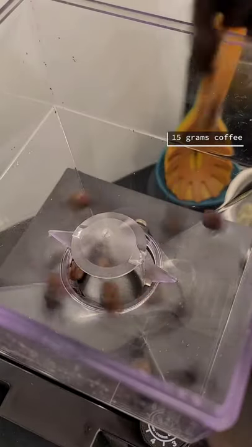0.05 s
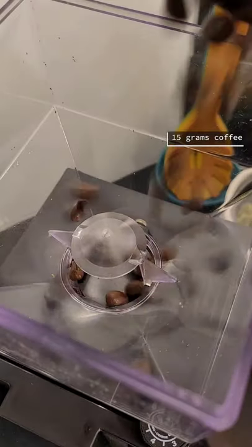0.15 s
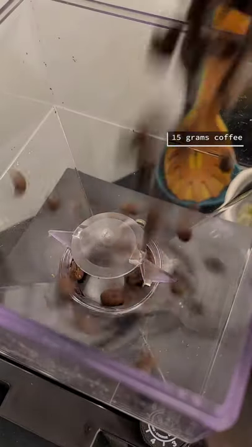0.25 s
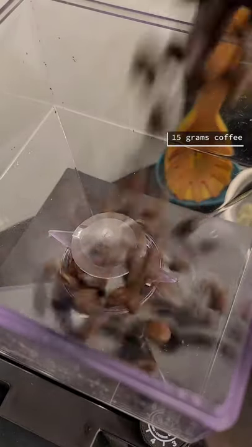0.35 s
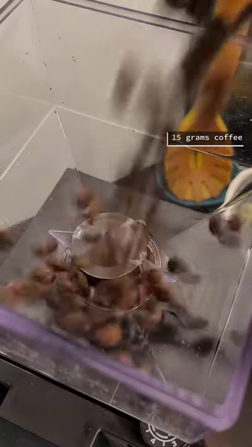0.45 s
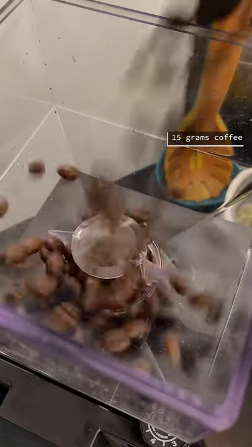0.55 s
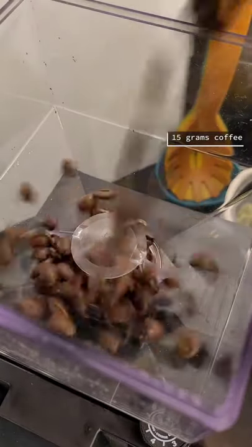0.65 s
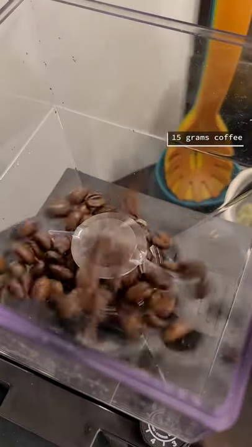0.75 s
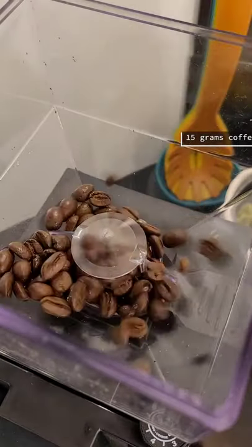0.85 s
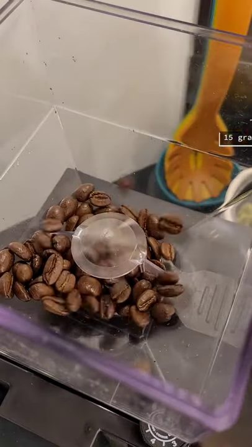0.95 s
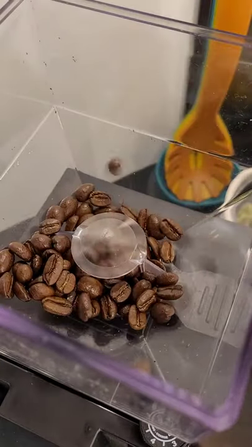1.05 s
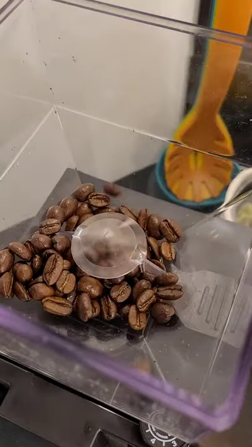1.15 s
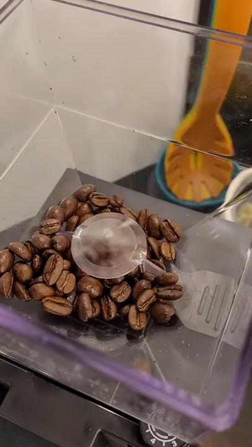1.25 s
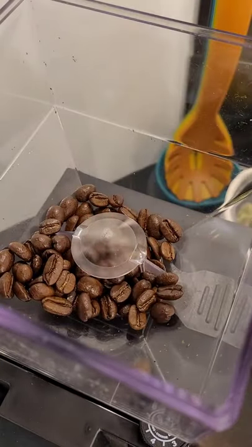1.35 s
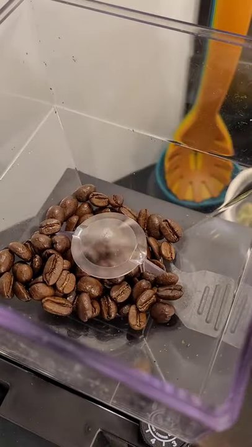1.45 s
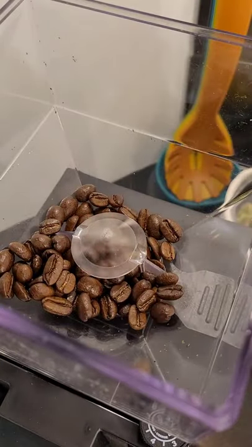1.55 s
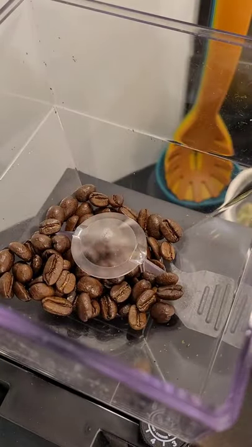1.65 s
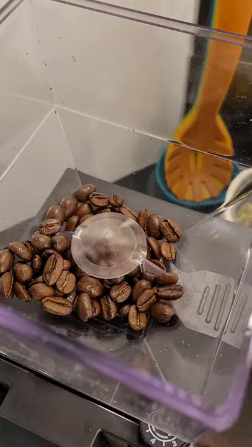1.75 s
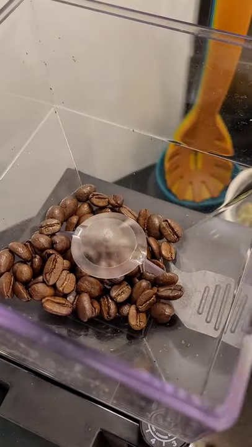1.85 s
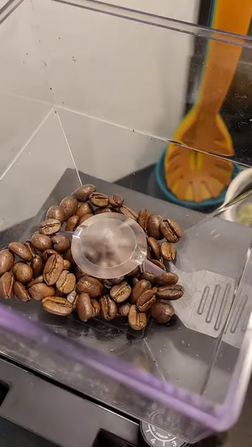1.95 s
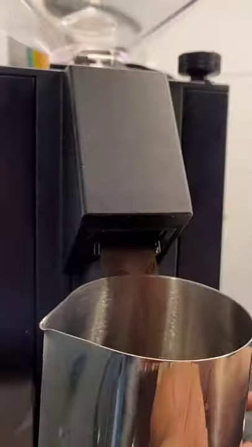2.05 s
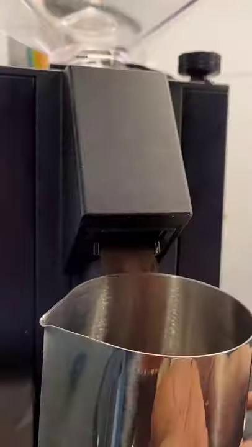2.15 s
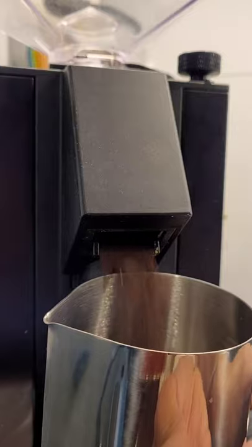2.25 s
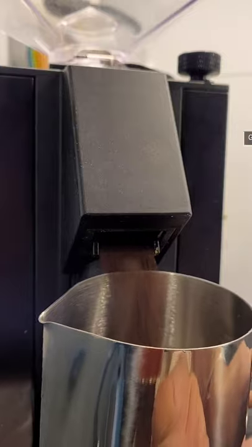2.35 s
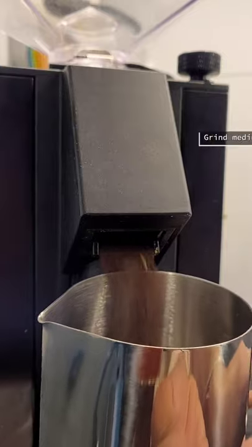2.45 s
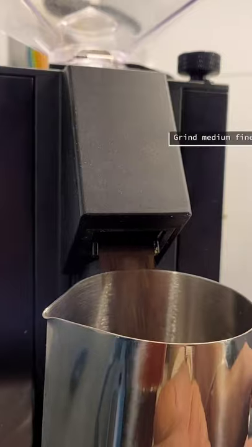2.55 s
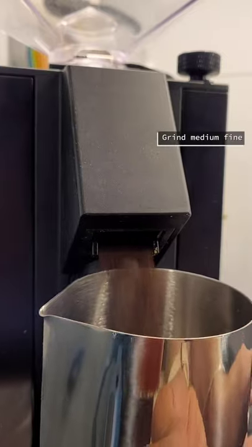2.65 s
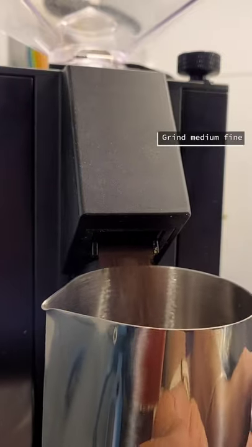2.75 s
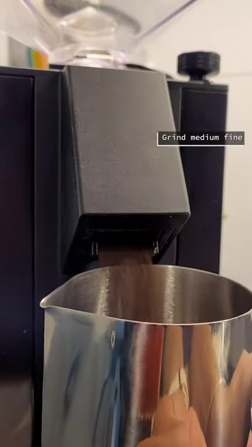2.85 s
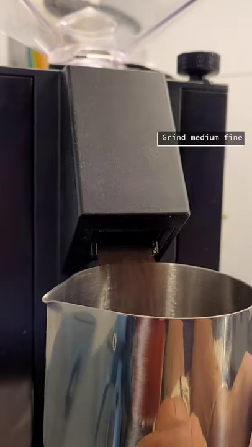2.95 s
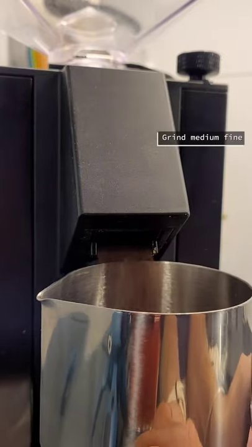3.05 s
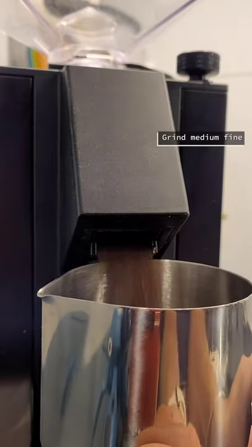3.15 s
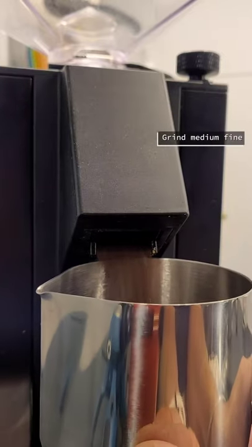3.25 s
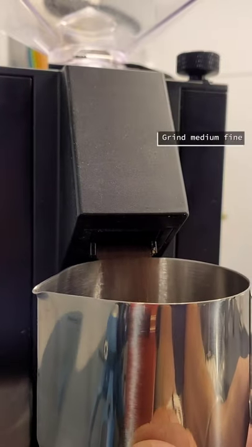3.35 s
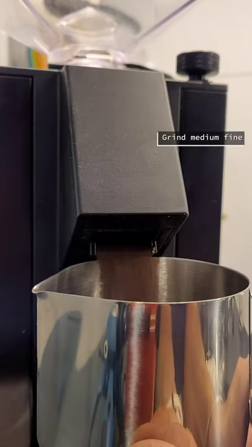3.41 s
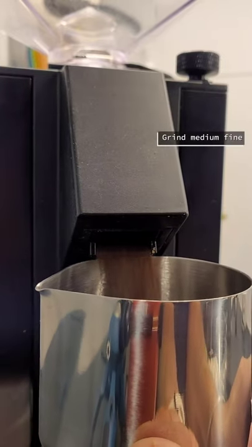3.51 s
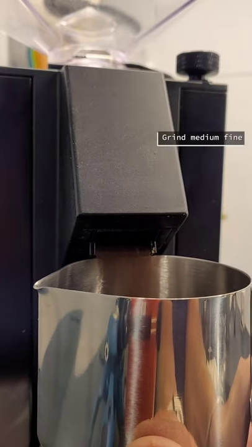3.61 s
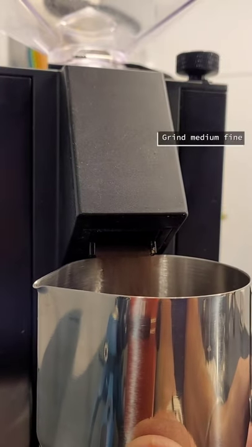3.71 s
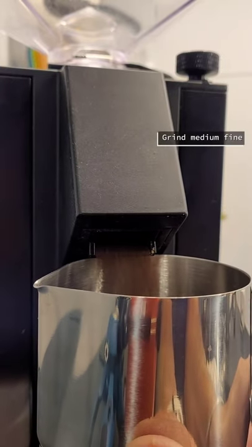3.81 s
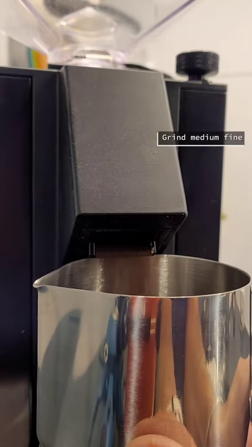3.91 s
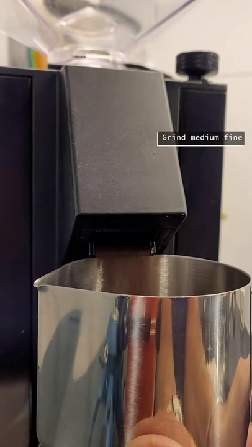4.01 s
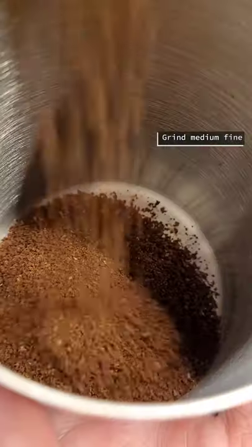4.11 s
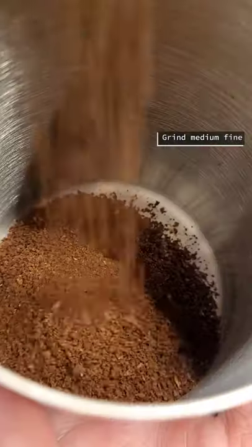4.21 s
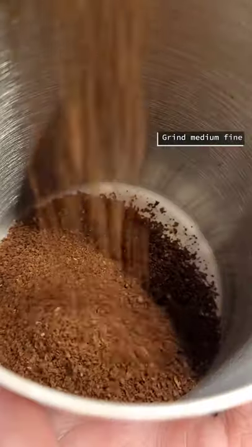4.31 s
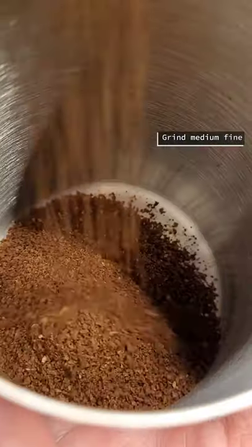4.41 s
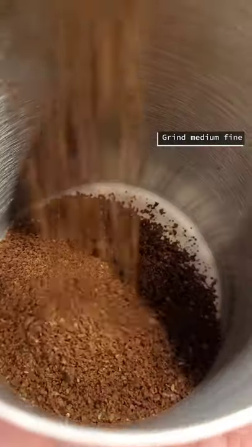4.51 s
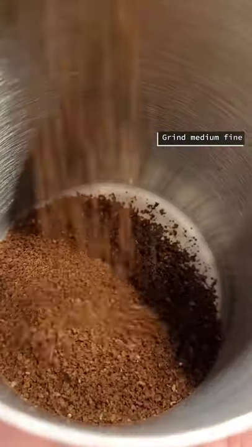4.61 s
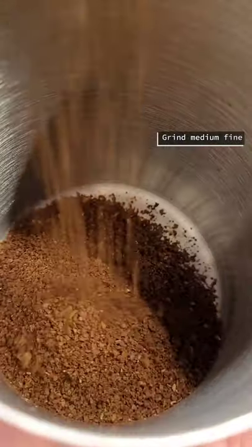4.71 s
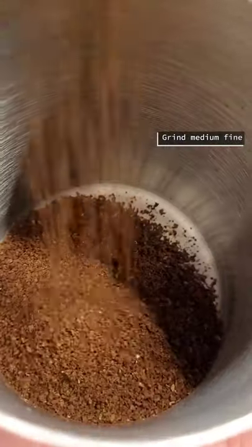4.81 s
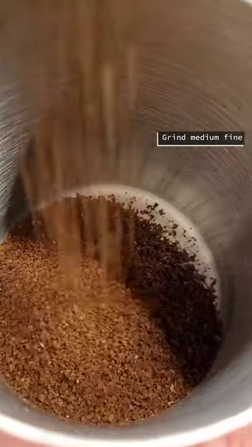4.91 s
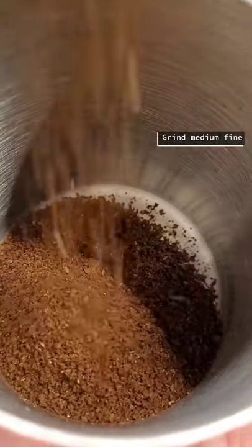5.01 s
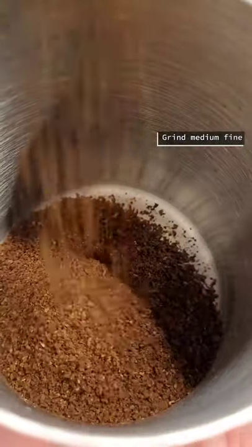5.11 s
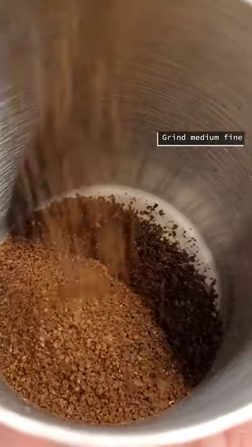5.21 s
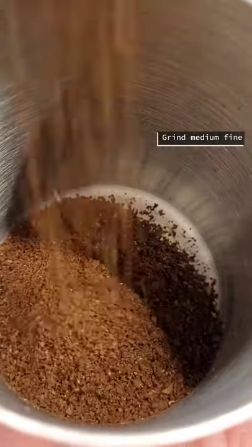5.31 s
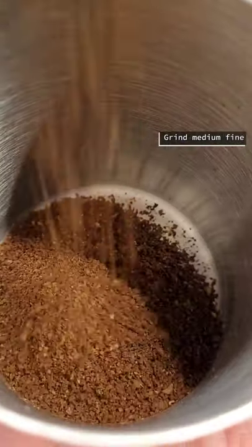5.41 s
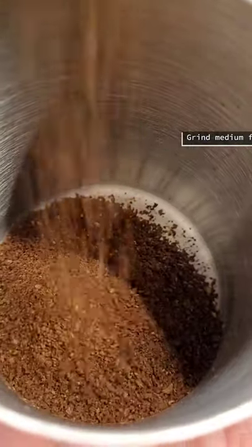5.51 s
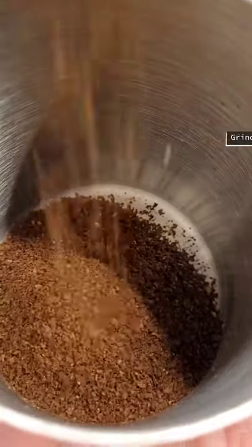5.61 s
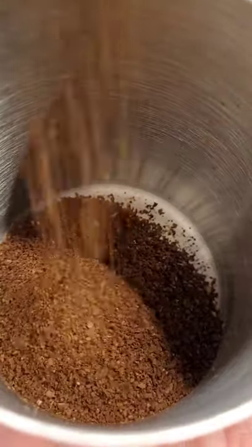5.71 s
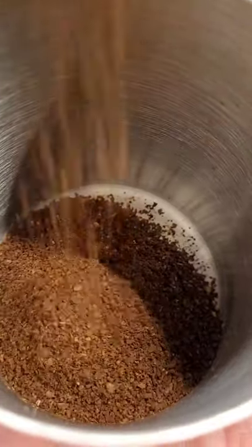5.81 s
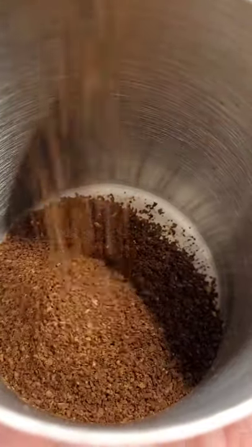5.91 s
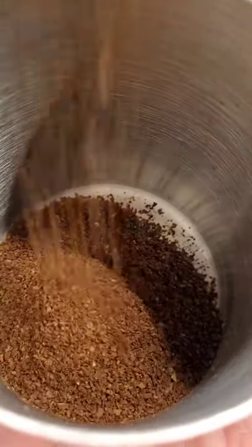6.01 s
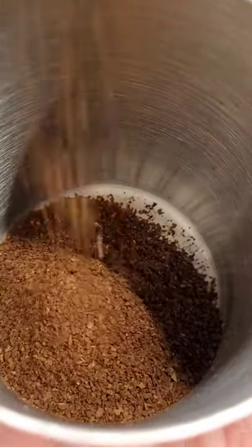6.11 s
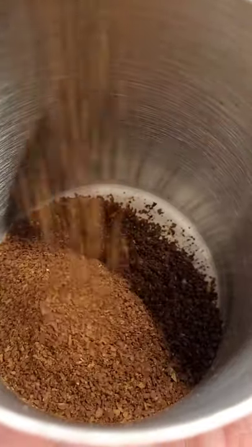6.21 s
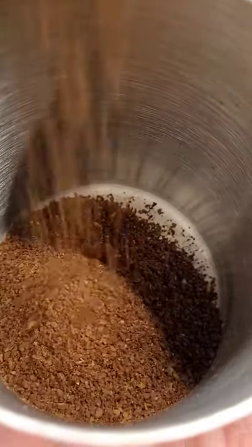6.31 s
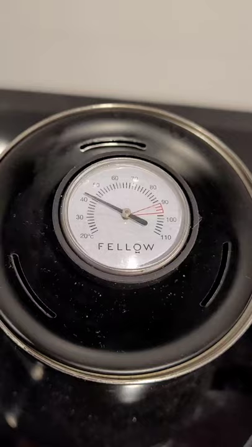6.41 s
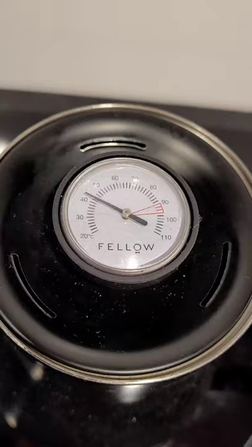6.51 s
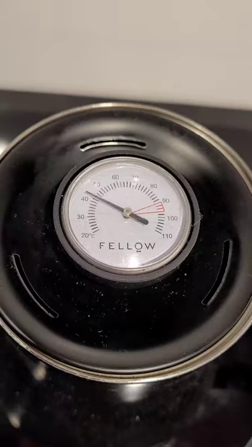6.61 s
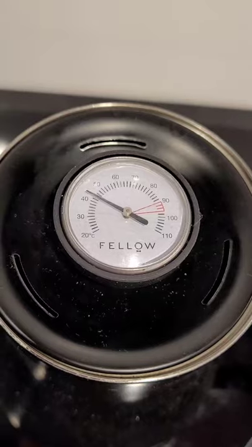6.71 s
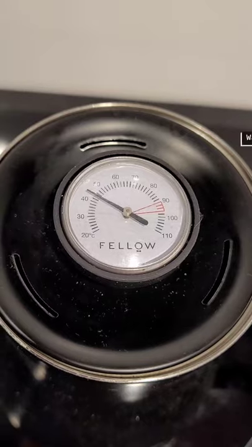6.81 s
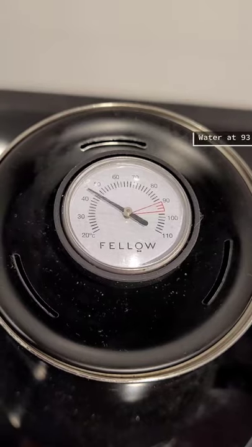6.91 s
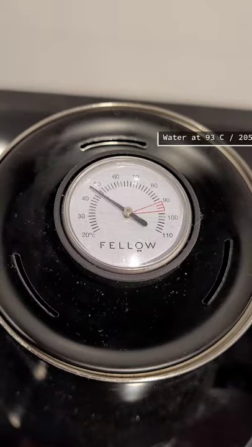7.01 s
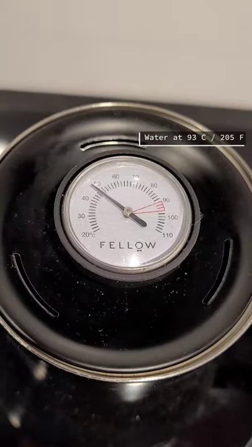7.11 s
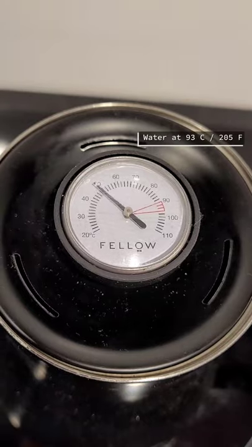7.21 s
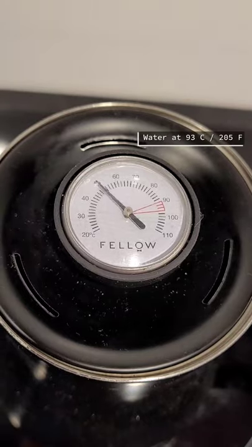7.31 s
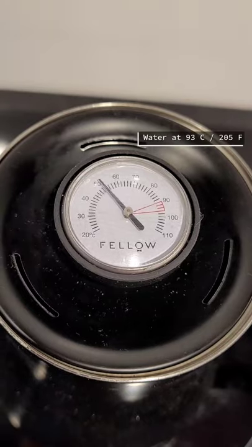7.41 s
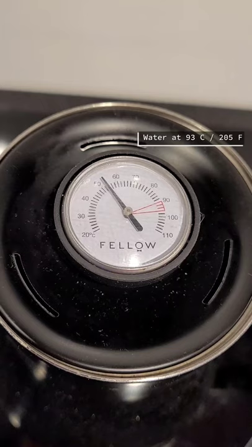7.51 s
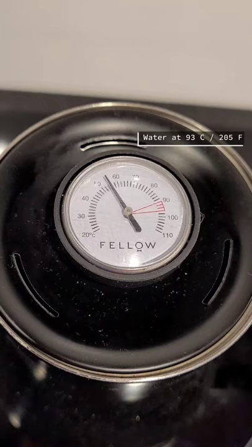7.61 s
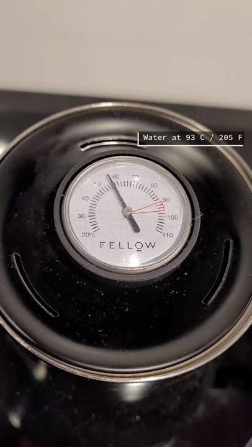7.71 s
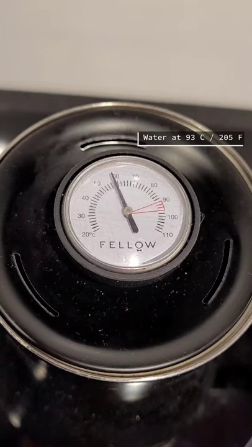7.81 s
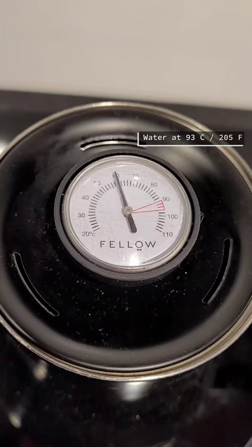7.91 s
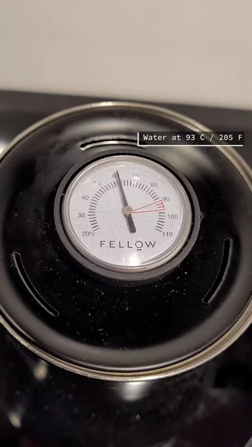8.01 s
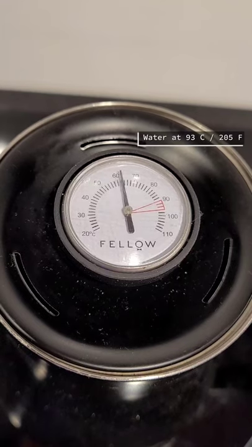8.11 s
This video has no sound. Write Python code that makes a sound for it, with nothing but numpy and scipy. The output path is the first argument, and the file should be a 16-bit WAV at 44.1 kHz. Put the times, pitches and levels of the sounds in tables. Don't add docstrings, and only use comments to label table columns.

```python
import sys
import numpy as np
from scipy import signal
from scipy.io import wavfile
from scipy.ndimage import uniform_filter1d

SR = 44100
rng = np.random.default_rng(int(sys.argv[2]) if len(sys.argv) > 2 else 0)


def how_loud(loudness_db):
    steps = np.asarray(loudness_db, float) / 20
    return 10 ** steps


def unload_wav(signal):
    wavfile.write(
        sys.argv[1],
        SR,
        np.round(np.clip(np.atleast_2d(signal).T, -1, 1) * 32767).astype(np.int16),
    )


N = 359415

CUTS = (2.0915, 4.108, 6.493)
# (time [s], level [dB], boom of the hopper air [dB])
POUR = [
    (0.0, -34, -21),
    (0.2, -31.5, -18),
    (0.26, -27, -25.5),
    (0.436, -22.5, -25.5),
    (0.73, -23.5, -24),
    (0.844, -26, -27.5),
    (1.076, -49, -14.5),
    (1.12, -53, -21.5),
]
# (frequency [Hz], left minus right [dB])
LEAN = [
    [(60, 17), (180, 9.5), (550, -5.5), (1650, 4.5), (4970, 5.5), (15000, 9.5)],
    [(60, -4.5), (180, 1.5), (550, -6.5), (1650, -0.5), (4970, -2), (15000, 1.0)],
    [(60, 5), (180, -5), (550, 5.5), (1650, 5.5), (4970, 4.5), (15000, 7)],
]


def evened(x):
    return x / np.sqrt(np.mean(x ** 2) + 1e-30)


def curve(rows, column):
    return np.interp(np.arange(N) / SR, [r[0] for r in rows], [r[column] for r in rows])


def during(t0, t1, fade=0.00071):
    t = np.arange(N) / SR
    return np.clip((t - t0) / fade, 0, 1) * np.clip((t1 - t) / fade, 0, 1)


def band(x, lo_hz, hi_hz):
    sos = signal.butter(3, [lo_hz, min(hi_hz, 0.49 * SR)], "band", fs=SR, output="sos")
    return signal.sosfilt(sos, x)


def body(x, points, modes=(), base_db=0., size=8192):
    hz = abs(np.fft.fftfreq(size, 1 / SR))
    point_hz, point_db = np.transpose(points)
    power = how_loud(2 * (base_db + np.interp(np.log(hz + 1), np.log(point_hz + 1), point_db)))
    power = power + sum(how_loud(2 * db) / (1 + (2 * (hz - f) / w) ** 2) ** 2 for f, w, db in modes)
    log_gain = 0.5 * np.log(power + 1e-14)
    taps = np.fft.ifft(np.exp(np.conj(signal.hilbert(log_gain)))).real[:size // 2]
    return signal.oaconvolve(x, taps.reshape((1,) * (x.ndim - 1) + (-1,)), axes=-1)[..., :N]


def clicks(per_s, spread_db):
    u = rng.random((N, 3))
    happens = u[:, 0] < per_s / SR
    return happens * np.sign(u[:, 1] - 0.5) * how_loud(-spread_db * np.log(u[:, 2] + 0.014))


def train(times, gains):
    out = np.zeros(N)
    np.add.at(out, np.round(np.asarray(times) * SR).astype(int), gains)
    return out


def slow(width_s):
    size = max(int(width_s * SR), 1)
    return evened(uniform_filter1d(uniform_filter1d(rng.standard_normal(N), size), size))


def steady(x, width_s):
    return x / np.sqrt(abs(uniform_filter1d(x ** 2, max(int(width_s * SR), 1))) + 1e-12)


def burst(decay_s, rise_s, size=4096):
    t = np.arange(size) / SR
    return (1 - np.exp(-t / rise_s)) * np.exp(-t / decay_s)


def struck(hits, envelope):
    return signal.oaconvolve(hits, envelope)[:N]


def swells(rows, rest_db, rise_s, fall_s):
    s, length, db = np.transpose(rows)
    held = np.cumsum(train(s - rise_s, how_loud(db)) - train(s + length - fall_s, how_loud(db)))
    edge = burst(fall_s, rise_s, size=SR // 2)
    return 20 * np.log10(abs(struck(held, edge / edge.sum())) + how_loud(rest_db))


def ports(x, t60, wet_db, lag, bass_hz=450):
    t = np.arange(int(1.2 * t60 * SR)) / SR
    tail = rng.standard_normal((2, len(t))) * how_loud(-60 * t / t60)
    tail *= how_loud(wet_db) / np.linalg.norm(tail, axis=1, keepdims=True)
    tail[0, max(int(lag), 0)] += 1
    tail[1, max(-int(lag), 0)] += 1
    bass = signal.sosfiltfilt(signal.butter(2, bass_hz, fs=SR, output="sos"), x)
    rest = signal.oaconvolve((x - bass)[None], tail, axes=1)[:, :N]
    return bass + rest / np.sqrt(1 + how_loud(2 * wet_db))


def leaning(pair, points):
    return np.array([body(x, [(hz, sign * db) for hz, db in points]) for x, sign in zip(pair, (0.5, -0.5))])


def room_tone():
    # (frequency [Hz], level [dB per Hz])
    wash_spectrum = [(170, -34), (200, -8), (350, 2), (420, -10), (650, -9), (760, -30.5), (1500, -29),
                     (15700, -40)]
    # (frequency [Hz], level [dB per Hz])
    hum_spectrum = [(20, -17), (60, 0), (90, -5.5), (150, 6), (185, -31), (500, -87.5)]
    # (start [s], length [s], level [dB])
    hum_swells = [
        (1.0, 0.057, -51),
        (1.23, .09, -64.5),
        (1.67, 0.1, -61),
        (1.82, .15, -77),
        (2.01, 0.074, -68),
    ]
    a, b = evened(body(rng.standard_normal((2, N)), wash_spectrum))
    wash = how_loud(-79.5) * np.array([a + 0.63 * b, a - 0.6 * b])
    hum_db = swells(hum_swells, rest_db=-71.5, rise_s=0.015, fall_s=0.033) - 1.6
    hum = evened(body(rng.standard_normal(N), hum_spectrum)) * how_loud(hum_db)
    return (wash + hum) * during(-1, CUTS[0])


def pour():
    # (time [s], peak [dB], hollow part below 3
    # kHz [dB])
    stream_beans = [(0.0053, -14, -41), (0.011, -9.5, -8), (0.025, -20, -6.5), (0.0445, -24.5, -16),
                    (0.067, -18, -8), (0.079, -11, -10.5), (0.098, -8.5, -15.5), (0.1167, -16, -19),
                    (0.1294, -21.5, 2), (0.1373, -14, -11.5), (0.1613, -16, -43.5), (0.1718, -14, -11),
                    (0.1829, -10.5, -13), (0.1996, -13, -16.0), (0.2057, -20.5, -19), (0.2245, -10.5, -19.5),
                    (0.236, -10, -17.5), (0.2431, -6, -14.5), (0.26, -11, -18.5), (0.2755, -11.5, -9),
                    (0.2861, -19.5, -12), (0.2959, -10.5, -22.5), (0.3281, -15.5, -14),
                    (0.3452, -10.5, -27.0), (0.3634, -18, -8), (0.3747, -10, -14), (0.391, -13.5, -15),
                    (0.4007, -15.5, -17), (0.418, -16.5, -21.5), (0.4398, -14.5, -10),
                    (0.4634, -14.0, -18.5), (0.4719, -12.5, -18.5), (0.4806, -24.5, -13),
                    (0.489, -17.5, -17.5), (0.5126, -17, -17), (0.5322, -14.5, -18), (0.5443, -13.5, -21),
                    (0.5577, -10, -16.5), (0.579, -15, -11.5), (0.6, -10.5, -23), (0.6165, -14.0, -14.5),
                    (0.6441, -10.5, -18), (0.6587, -13, -16), (0.668, -18.5, -10), (0.678, -14, -20.5),
                    (0.6876, -13.5, -30), (0.7002, -13, -18.0), (0.7187, -10.5, -28), (0.7272, -11, -27),
                    (0.7419, -14, -16), (0.763, -11, -17), (0.7779, -11.5, -23), (0.8017, -17.5, -32),
                    (0.8218, -13, -25.0), (0.851, -10, -26), (0.8642, -9, -10), (0.8834, -17.5, -16.0),
                    (0.9014, -27, -12), (0.911, -8.5, -16), (0.9305, -17, -23),
                    (.0004, -13.5, -17.5),
        (0.1435, -15.5, -5.5),
        (.311, -28.5, -12.5),
        (0.496, -19, -16.5),
        (.589, -10.5, -22),
        (0.635, -10.5, -17.5),
        (.792, -18, -23),
    ]
    # (time [s], peak [dB])
    bounces = [(0.9445, -30), (0.9534, -36), (0.961, -36), (0.97, -31), (0.9777, -26.5), (0.99, -49),
               (0.9985, -36), (1.016, -28.5), (1.034, -51), (1.0513, -46), (1.0629, -20.5), (1.1064, -45),
               (1.17, -38), (1.181, -30.5), (1.2505, -37), (1.276, -44), (1.3155, -45)]
    s, db, hollow_db = np.transpose(sorted(stream_beans))
    end_s, end_db = np.transpose(bounces)
    return np.hstack([[s, db - 3.5, hollow_db - 0.5], [end_s, end_db, -19 + 0 * end_s]])


def beans():
    # (frequency [Hz], level [dB per Hz])
    wall = [(800, -49.5), (1300, -29), (1750, -18), (2100, -8), (2700, -15), (3650, -2), (3930, -17),
            (4200, 1.5), (5800, -6), (7300, -6.5), (8900, -4.5), (11700, -3), (15700, -1)]
    # (frequency [Hz], width [Hz], level [dB])
    wall_modes = [(1869, 44, -3), (1926, 31, 1), (3340, 67, -3.5), (4540, 25, -11), (4580, 160, -1.5),
                  (6170, 270, -4), (7133, 51, 5.5), (7470, 1400, 0.5), (11900, 910, 0.5), (14050, 54, -7)]
    s, db, hollow_db = pour()
    out = np.zeros((2, N))
    for k, lag in enumerate((1.5, -8.0, -18.0, -4.0)):
        hit = slice(k, None, 4)
        rattle = body(rng.standard_normal(N), wall, wall_modes, base_db=-1.5)
        high = steady(band(rattle, 3000, 18000), 0.002)
        low = steady(band(rattle, 610, 3130), 0.0073)
        bright = struck(train(s[hit], how_loud(db[hit])), burst(0.0033, 0.00016))
        hollow = struck(train(s[hit], how_loud(db[hit] + hollow_db[hit])), burst(0.0099, 0.001))
        small = evened(struck(abs(clicks(350, 1.5)), burst(0.003, 0.0006)))
        small = small * how_loud(curve(POUR, 1) - 2.5) * during(-1, POUR[-1][0], 0.026)
        dry = high * (1.22 * bright + 0.64 * small) + low * (1.36 * hollow + 0.21 * small)
        out += ports(dry, 0.025, -1.0, lag)
        out += how_loud(-12) * ports(band(dry, 1300, 13000), 0.15, 15., 0)
    ring = struck(train(s[-3:], how_loud(db[-3:])), burst(0.11, 0.0093, size=SR))
    out += how_loud(-47) * ring * evened(band(rng.standard_normal((2, N)), 4900, 5150))
    return leaning(out, LEAN[0])


def box():
    # (frequency [Hz], width [Hz], level [dB])
    air_modes = [(353, 27, -4.5), (559, 67, 1.5), (695, 15, -1), (940, 50, -9)]
    base = [(200, -27.5), (300, -15.5), (1000, -13.5), (1500, -25), (1900, -37.5)]  # (Hz, dB per Hz)
    level = how_loud(curve(POUR, 1) + curve(POUR, 2) - 5.0) * during(-1, 1.48, 0.42)
    out = np.zeros((2, N))
    for _ in range(3):
        lumpy = clicks(400, 2.5) * how_loud(1.5 * slow(0.039))
        boom = evened(body(lumpy, base, air_modes))
        out += ports(boom * level, 0.02, 0., 9.3, bass_hz=200)
    return out * how_loud([[2.5], [-2.5]])


def knocks():
    # (time [s], level [dB], frequency [Hz])
    bean_blows = [(0.004, -47, 588), (0.046, -55, 575), (0.1, -61, 695), (0.132, -49, 353),
                  (0.136, -45, 586), (0.137, -50.5, 940), (0.229, -50, 580), (0.241, -45, 695),
                  (0.242, -42, 940), (0.273, -55.5, 353), (0.293, -45, 583), (0.359, -61, 695),
                  (0.367, -46.5, 586), (0.42, -49, 940), (0.432, -44.5, 353), (0.465, -41, 695),
                  (0.466, -40.5, 940), (0.487, -48.5, 575), (0.525, -45.5, 940), (0.574, -57, 353),
                  (0.576, -48, 575), (0.661, -50, 940), (0.662, -43.5, 554), (0.672, -49.5, 353),
                  (0.728, -43, 575), (0.778, -55, 940), (0.824, -48, 574), (0.856, -48.5, 580),
                  (0.859, -50, 695), (0.863, -51, 353),
                  (.1, -44, 575),
        (.192, -44, 940),
        (.195, -45, 695),
        (.315, -51.5, 572),
    ]
    blows = bean_blows
    out, t = np.zeros((2, N)), np.arange(4096) / SR
    envelope = burst(0.016, 0.005)
    for (s, db, hz), u in zip(blows, rng.random((len(blows), 2))):
        phase = np.array([[0], [2.5 * (u[0] - 0.5)]])
        side = how_loud(4 * (u[1] + 0.5) * np.array([[1], [-1]]))
        ring = envelope * np.sin(2 * np.pi * hz * t + phase)
        start = round(s * SR)
        out[:, start:start + len(t)] += how_loud(db + 4) * ring * side
    return out


def thumps():
    # (time [s], level [dB])
    stand_knocks = [(0.009, -37), (0.099, -49), (0.159, -38), (0.277, -33.5), (0.439, -45), (0.538, -36),
                    (0.561, -39), (0.678, -35.5), (0.74, -41.5), (0.843, -44.5), (0.868, -33),
                    (0.909, -38.5)]
    s, db = np.transpose(stand_knocks)
    t = np.arange(3000) / SR
    glide = 260 * 0.0029 * (1 - np.exp(-t / 0.0021))
    knock = np.cos(2 * np.pi * glide + 2 * np.pi * 45 * t) * np.exp(-t / 0.011)
    knock *= 1 - np.exp(-t / 0.00022)
    blows = train(s, how_loud(db - 1.5)) + how_loud(-55.5) * clicks(60, 3.6) * during(-1, 0.98)
    return struck(blows, knock) * how_loud([[5.], [-16.]])


def burr_load(shot):
    # (time [s], level [dB])
    crunch_levels = [
        [(2.1, -38), (4.1, -38.5)],
        [(4.11, -40), (4.62, -41), (4.79, -43), (4.93, -38), (5.14, -42), (5.26, -37.5), (5.5, -40.5),
         (5.73, -44.5), (6.44, -50.5)],
    ]
    # (time [s], level [dB])
    breaks = [(2.104, -33), (2.134, -30), (2.189, -39), (2.256, -33), (2.282, -53), (2.316, -37),
              (2.478, -44), (2.528, -27), (2.593, -37), (2.618, -36), (2.668, -35), (2.724, -32),
              (2.788, -32), (2.843, -42), (2.906, -32), (2.974, -27), (3.001, -34), (3.107, -41),
              (3.153, -41), (3.242, -26), (3.266, -32), (3.343, -32), (3.446, -30), (3.485, -33),
              (3.527, -25), (3.595, -32), (3.656, -42), (3.684, -28), (3.72, -35), (3.792, -45),
              (3.833, -24.5), (3.928, -28.5), (3.98, -25.5), (4.053, -37), (4.094, -30.5), (4.144, -31),
              (4.181, -31.5), (4.205, -42), (4.329, -34), (4.366, -32.5), (4.415, -28), (4.452, -33),
              (4.514, -45), (4.56, -41), (4.592, -32.5), (4.633, -28), (4.746, -33), (4.813, -30),
              (4.928, -37), (4.961, -30), (5.046, -30), (5.094, -28), (5.135, -32.0), (5.207, -29),
              (5.266, -26), (5.388, -26), (5.447, -38), (5.493, -30), (5.546, -41), (5.57, -35)]
    # (time [s], level [dB], length [s])
    stragglers = [(2.311, -38, 0.035), (5.673, -35, 0.034), (5.747, -44.5, 0.0073), (5.787, -48, 0.0089),
                  (5.82, -35.5, 0.035), (5.883, -40.5, 0.031), (5.939, -34, 0.031), (6.007, -37, 0.015),
                  (6.04, -39.5, 0.044), (6.097, -42.5, 0.021), (6.18, -40, 0.034), (6.238, -38, 0.031),
                  (6.27, -39.5, 0.0048), (6.31, -42.5, 0.0086), (6.357, -40, 0.024), (6.457, -39.5, 0.036)]
    s, db, length = np.transpose([(s, db - 7.5, 0.0056) for s, db in breaks] + stragglers)
    gain = how_loud(db - 3.5)
    held = np.cumsum(train(s, gain) - train(s + length, gain))
    edge = burst(0.0015, 0.0002)
    cracks = struck(held, edge / edge.sum())
    cracks += struck(train(s + length, gain), burst(0.018, 0.0024))
    even = how_loud(2 * (curve(crunch_levels[shot], 1) + 0.78 * slow(0.011)))
    return np.sqrt(even + cracks ** 2)


def crunch(shot, load, lag):
    # (frequency [Hz], level [dB per Hz])
    housing = [
        [(500, -31.5), (700, -15.5), (980, -13.5), (1100, -1.5), (1500, -2), (2000, -7), (2700, -17),
         (3100, -11.5), (4000, -18), (7300, -21), (8300, -30), (10500, -25.5), (15700, -26)],
        [(500, -30.5), (700, -15), (930, -18), (1080, 2), (1420, -5.5), (2320, -8), (2700, -11.5), (3200, -9.5),
         (3600, -17), (5000, -18.5), (7400, -22), (9000, -31.5), (10500, -23), (15700, -25.5)],
    ]
    # (frequency [Hz], width [Hz], level [dB])
    housing_modes = [
        [(1305, 58, -1), (1494, 21, 3.5), (2298, 55, -5.5), (2898, 44, -7), (3344, 88, -12.5), (4600, 46, -12),
         (4930, 48, -10), (5260, 270, -15), (7260, 560, -20.5)],
        [(1152, 48, -3.5), (1593, 62, -1.5), (1895, 19, 2.5), (2090, 26, -31), (2280, 51, 1.5),
         (2984, 72, -7.5), (3304, 78, -4.5), (4990, 310, -15), (7130, 360, -20.5)],
    ]
    dusty = (load / how_loud(-33)) ** 0.12 - 1
    treble = signal.butter(2, 5500, "high", fs=SR, output="sos")
    out = np.zeros((2, N))
    for k in range(-2, 3):
        detune = 1 + 0.0078 * k
        modes = [(f * detune, w, db) for f, w, db in housing_modes[shot]]
        panel = body(clicks(2000, 3.5), housing[shot], modes, base_db=-3.5)
        panel += dusty * signal.sosfiltfilt(treble, panel)
        strength = load * how_loud(1.8 * slow(0.083)) / band(panel, 1247, 2740).std()
        out += 0.5 * ports(panel * strength, 0.014, -3.5, lag + 3 * k)
    return out


def shake(load, lag, shake_db, rumble_db):
    # (frequency [Hz], level [dB per Hz])
    bass_spectrum = [(20, -39), (100, -10), (210, -11.5), (290, 0), (370, -1.5), (470, -5), (700, -6.5),
                     (900, -17), (1100, -38)]
    bass = evened(body(rng.standard_normal(N), bass_spectrum, [(95, 80, rumble_db - 14)]))
    return ports(bass * how_loud(shake_db) * (load / load.max()) ** 0.59, 0.03, 9.4, lag)


def motor(shot, order_db):
    # (time [s], frequency [Hz])
    speed = [(2.1, 299.6), (2.25, 305.7), (2.38, 290), (2.52, 286), (2.72, 280.8), (2.8, 283), (2.9, 281),
             (2.96, 294.7), (3.02, 275.8), (3.14, 287), (3.2, 295.5), (3.5, 297.4), (3.8, 292.4),
             (4.1, 295.3), (4.6, 298), (5.25, 295.1), (5.7, 296.8), (6.5, 297.4)]
    # (start [s], length [s], level [dB])
    surges = [
        [(2.155, 0.1, -43), (2.311, 0.051, -41.5), (2.373, 0.06, -46), (2.518, 0.23, -41), (2.79, 0.029, -41),
         (2.864, 0.069, -48), (3.0, 0.043, -38.5), (3.06, 0.065, -47), (3.19, 0.038, -37), (3.24, .065, -45),
         (3.338, 0.1, -45), (3.456, 0.11, -40.5), (3.596, 0.061, -45), (3.722, 0.046, -42), (3.797, 0.039, -47),
         (3.841, 0.044, -46), (4.039, 0.061, -43)],
        [(4.11, .6, -51), (4.8, 0.455, -55), (5.22, 0.093, -44.5), (5.32, 0.2, -53), (5.6, 0.17, -55.5),
         (5.85, 0.15, -57.5), (6.04, 0.085, -54), (6.18, 0.035, -53), (6.245, 0.045, -44)],
    ]
    idle_db = (-48.5, -58)[shot]
    grip_db = swells(surges[shot], idle_db, rise_s=0.0055, fall_s=0.011) - 2
    turn = 2 * np.pi * np.cumsum(curve(speed, 1) * (1 + 0.0092 * slow(0.019))) / SR
    grip = how_loud(grip_db + 1 + 1.5 * slow(0.012))
    judder = 0.34 * evened(band(rng.standard_normal(N), 260, 344))
    second = how_loud(order_db + 2.4 * slow(0.047)) * np.sin(2 * turn) * np.array([[0.5], [1.4]])
    return grip * (np.sin(turn) + judder + second)


def grinder(shot):
    # (left lag [samples], second motor order [dB], housing bass [dB], worktop rumble [dB])
    view = [
        (15, -13.5, -47.5, -18),
        (-17.5, -13, -51, 5),
    ]
    lag, order_db, shake_db, rumble_db = view[shot]
    load = burr_load(shot)
    out = crunch(shot, load, lag) + shake(load, lag, shake_db, rumble_db) + motor(shot, order_db)
    return leaning(out, LEAN[shot + 1]) * during(*CUTS[shot:shot + 2])


def sprays():
    # (time [s], peak [dB])
    puffs = [(4.2568, -41), (4.3304, -38), (4.48, -30), (4.6162, -31), (4.8761, -34), (5.0427, -34),
             (5.1375, -36), (5.1759, -40), (5.2094, -39), (5.2957, -44), (5.3406, -41), (5.4423, -41),
             (5.4862, -45), (5.5341, -42)]
    s, db = np.transpose(puffs)
    grit = evened(band(rng.standard_normal(N), 5200, 16500))
    spray = grit * struck(train(s, how_loud(db - 7.5)), burst(0.008, 0.001))
    return ports(spray, 0.0091, 0., -14) * how_loud([[3.], [-3.]])


def tick(hz, cycles):
    t = np.arange(-60, 200) / SR
    return np.sin(2 * np.pi * hz * t) * np.exp(-abs(t) * hz / cycles * np.where(t < 0, 3., 1.))


def collapses(rows, gain_db, cycles):
    lead_s = 60 / SR
    return sum(struck(train([s - lead_s], how_loud(db + gain_db)), tick(hz, cycles)) for s, db, hz in rows)


def kettle():
    # (frequency [Hz], level [dB per Hz])
    base_spectrum = [(12, -55), (20, -18.5), (81, -9.5), (145, 3.5), (226, -4.5), (318, -2.5), (538, -9),
                     (686, -5), (1180, -19.5), (1390, -18), (2500, -24), (3250, -27), (5500, -120)]
    # (time [s], level [dB])
    heat = [
        (6.5, -48.5),
        (8.15, -50.5),
    ]
    # (time [s], peak [dB], frequency [Hz])
    small_bubbles = [(6.4925, -31, 9700), (6.5143, -26, 10800), (6.5278, -21, 14500), (6.5585, -29, 6740),
                     (6.5647, -30, 7900), (6.6101, -29, 12700), (6.655, -35, 11700), (6.665, -31, 14000),
                     (6.6844, -41, 5210), (6.7059, -35, 14600), (6.7193, -31, 14400), (6.728, -32, 7310),
                     (6.741, -24.5, 7170), (6.7972, -25, 14300), (6.8285, -29, 10500), (6.847, -28, 13100),
                     (6.866, -22, 11900), (6.9137, -31, 7770), (6.9458, -31, 11100), (6.9703, -29, 11800),
                     (7.008, -23, 13400), (7.0675, -20.5, 10300), (7.1022, -24, 8550), (7.1489, -26, 12400),
                     (7.1838, -26, 11100), (7.1953, -28, 14000), (7.2337, -51, 12100), (7.2337, -29, 9800),
                     (7.2521, -30, 13600), (7.2701, -37, 12400), (7.286, -26.5, 7800), (7.3519, -38, 13500),
                     (7.3674, -35, 9600), (7.3877, -37, 7290), (7.4013, -24.5, 11000), (7.4587, -39, 11900),
                     (7.4711, -38, 7940), (7.4796, -34, 9750), (7.4861, -31, 13500), (7.508, -23, 13300),
                     (7.529, -27, 8400), (7.5539, -35, 5770), (7.582, -32, 12000), (7.5967, -27.5, 7100),
                     (7.6362, -32, 13600), (7.6627, -29, 8640), (7.7106, -32, 8130), (7.7315, -30, 10400),
                     (7.741, -26, 13800), (7.7864, -36, 7750), (7.7979, -35, 11900), (7.8122, -23, 11300),
                     (7.8458, -31, 11600), (7.8557, -34, 14600), (7.8962, -25, 10600), (7.9705, -32, 14800),
                     (7.9999, -37, 7140), (8.0149, -32, 8000), (8.082, -29, 13000), (8.1176, -27, 11800)]
    # (time [s], peak [dB], frequency [Hz])
    large_bubbles = [
        (6.6008, -37, 2190),
        (6.655, -43, 1420),
        (6.8988, -39, 1400),
        (6.939, -39.5, 1260),
        (7.3446, -38.5, 1480),
        (7.749, -42, 1090),
        (7.8106, -54, 1030),
    ]
    rumble = body(rng.standard_normal(N), base_spectrum)
    rumble *= how_loud(curve(heat, 1) + 1.46 * slow(0.01)) / band(rumble, 60, 1040).std()
    hiss = how_loud(-57.5) * evened(band(rng.standard_normal(N), 2700, 17000))
    crowd = how_loud(4 * slow(0.017))
    fizz = np.zeros(N)
    for hz in np.linspace(3500, 18000, 14):
        fizz += struck(clicks(40 * crowd, 3.2), hz * tick(hz, 1.3))
    bubbles = collapses(small_bubbles, 3.0, 1.0) + collapses(large_bubbles, 4.5, 0.94)
    bubbles = bubbles + how_loud(-50.5) * evened(fizz)
    return (rumble + hiss + ports(bubbles, 0.012, -13., 0)[0]) * during(CUTS[2], 9)


def scene():
    hopper = room_tone() + beans() + box() + knocks() + thumps()
    return hopper + grinder(0) + grinder(1) + sprays() + kettle()


def band_limit(x):
    return signal.sosfilt(signal.butter(12, 17090, fs=SR, output="sos"), x)


def record(dry):
    edge = signal.firwin(1001, 15790, window=("kaiser", 8), fs=SR)
    mix = signal.oaconvolve(0.89 * np.tanh(dry / 0.91), edge[None], "same")
    return band_limit(mix)


dry = scene()
out = record(dry)
unload_wav(out)
```